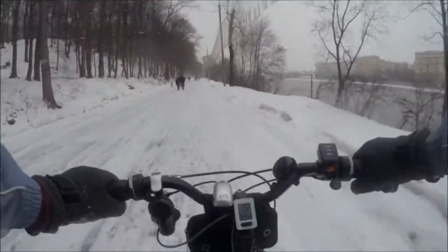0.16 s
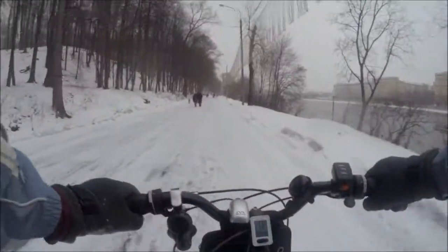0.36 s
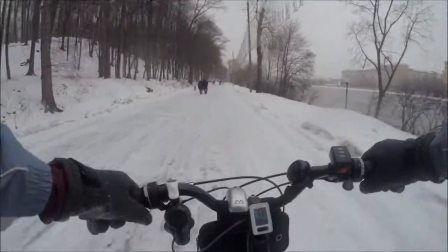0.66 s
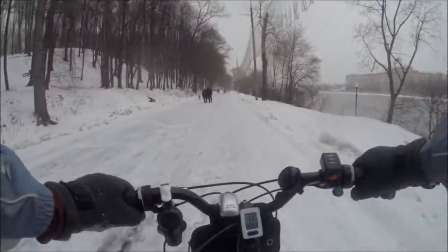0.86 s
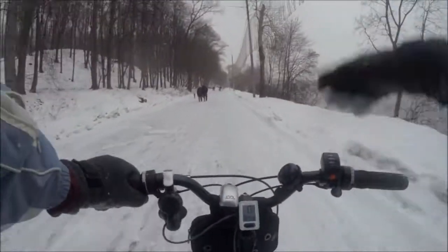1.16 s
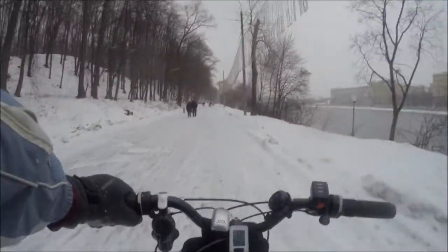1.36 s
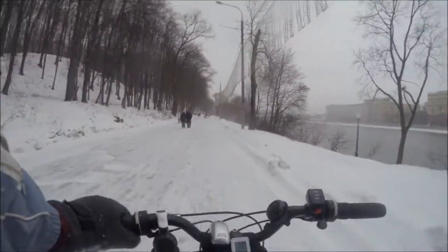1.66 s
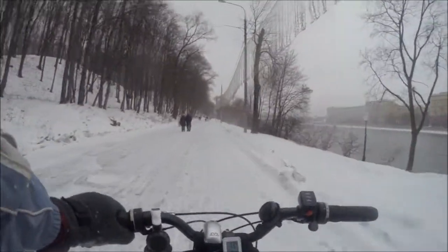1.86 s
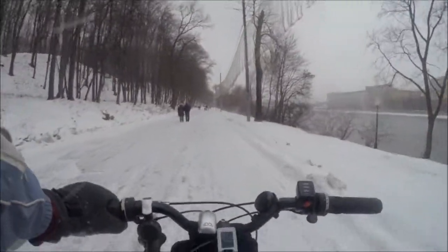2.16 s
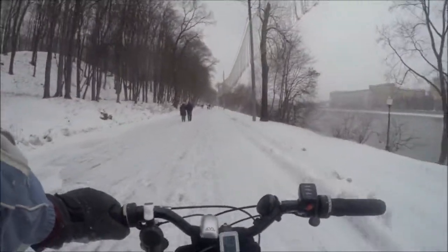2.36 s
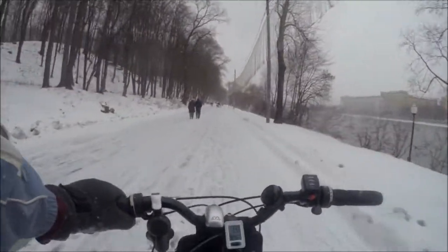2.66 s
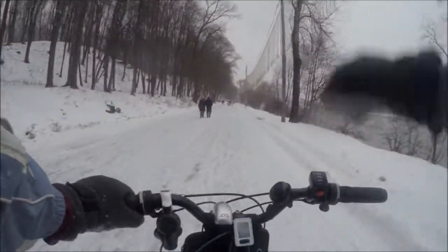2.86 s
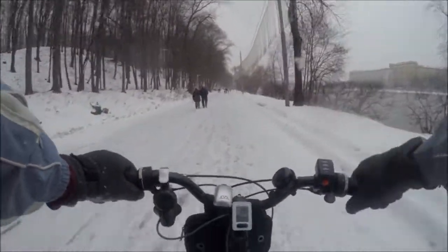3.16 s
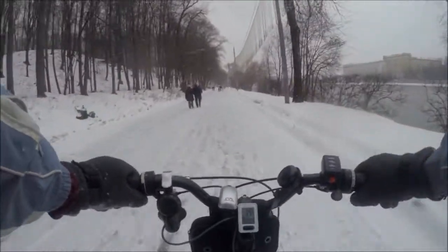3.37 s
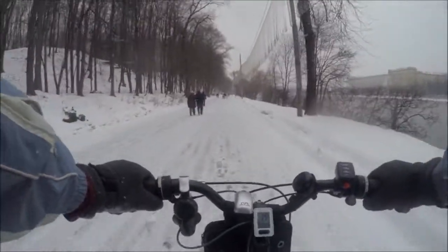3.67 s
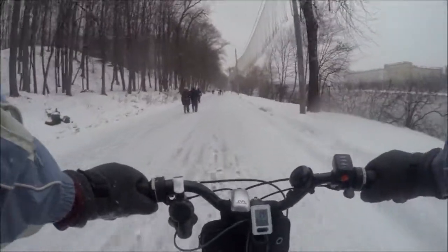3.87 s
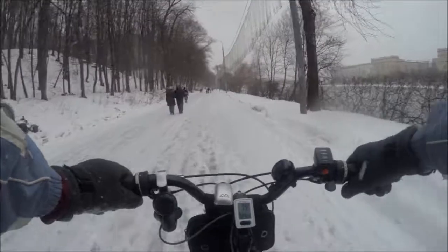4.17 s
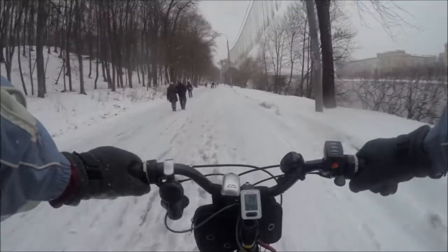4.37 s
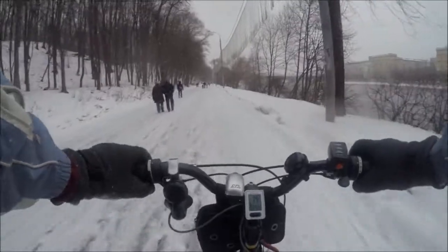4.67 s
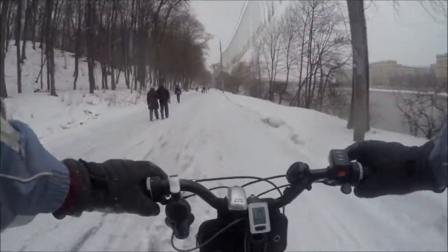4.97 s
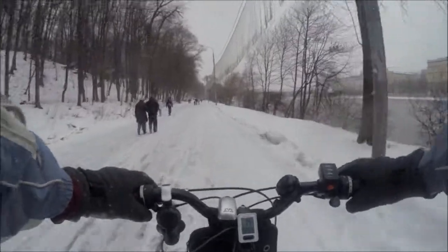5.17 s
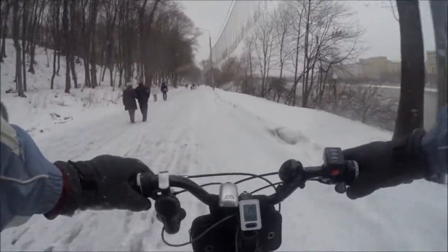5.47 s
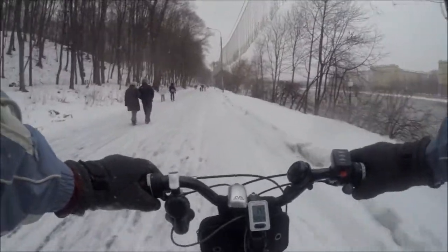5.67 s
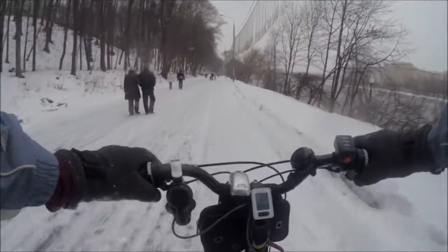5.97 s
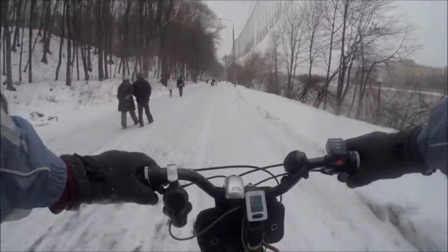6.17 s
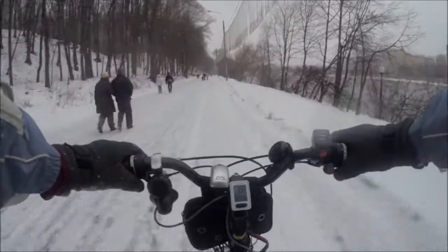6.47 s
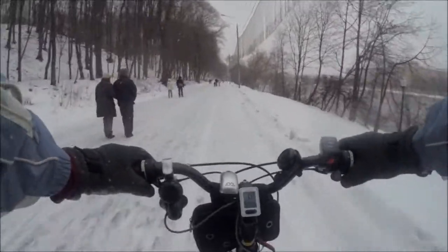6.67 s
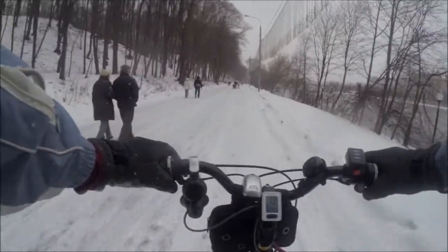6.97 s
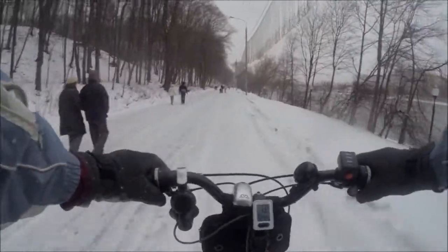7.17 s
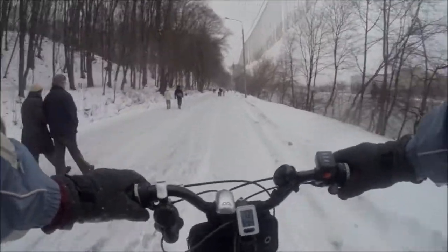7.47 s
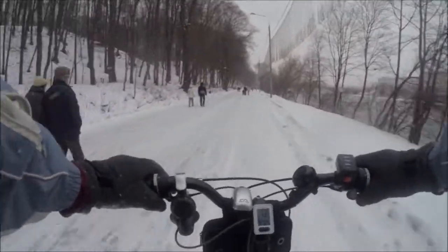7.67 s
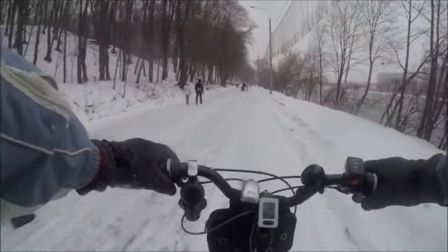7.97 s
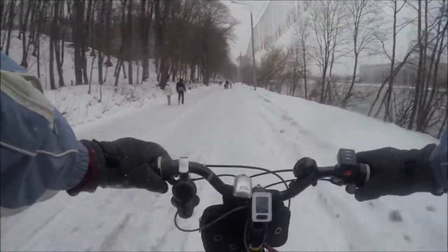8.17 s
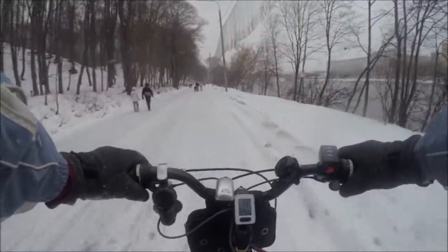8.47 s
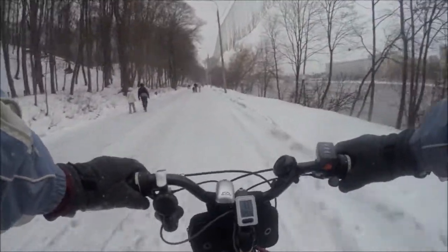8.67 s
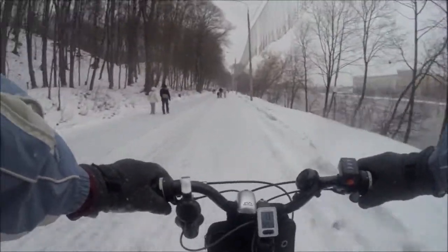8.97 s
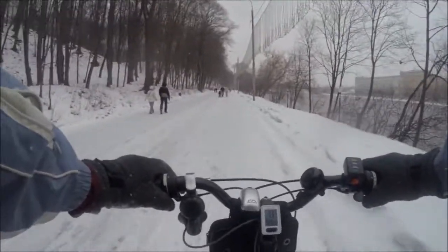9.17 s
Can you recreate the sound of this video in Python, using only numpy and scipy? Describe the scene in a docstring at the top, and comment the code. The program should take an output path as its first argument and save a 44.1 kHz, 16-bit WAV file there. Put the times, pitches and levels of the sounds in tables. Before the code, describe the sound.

A bicycle rolls over packed snow outdoors, heard from a microphone on the rider's chest. The grainy tyre hiss starts louder in loose snow, then settles quieter, with irregular crunches of breaking lumps. Soft low thuds mark regular pedal strokes over weak wind rumble. A sleeve brushes past early on, followed by dull knocks; small jacket ticks and a sharp snap come later.

```python
"""Bicycle tyres roll over packed snow, heard from a camera on the rider's chest: noise and tiny grains
are shaped into a hiss, with listed lumps and random crumbs of snow crunching as resonated cracks.
Each pedal stroke jogs the camera with a soft low thud, and coloured noise makes the wind rumble underneath.
A sleeve brushes past once and the jacket swishes, both as shaped noise; jacket ticks are filtered bursts.
Housing knocks, fitting snaps and frame bumps are dying sine modes, over faint microphone hiss."""
import sys
import numpy as np
from scipy import signal
from scipy.fft import rfft, irfft
from scipy.io import wavfile
from scipy.ndimage import uniform_filter1d

SR = 44100
rng = np.random.default_rng(int(sys.argv[2]) if len(sys.argv) > 2 else 0)


def wrap_up_sound(samples):
    """Save the sound to the file named by the first command line argument, as 16-bit audio."""
    columns = np.atleast_2d(samples).T
    # keep every value between -1 and 1, then stretch to whole-number steps
    tamed = np.clip(columns, -1, 1)
    steps = np.round(tamed * 32767).astype(np.int16)
    wavfile.write(sys.argv[1], SR, steps)


N = 411453
TIME = np.arange(N) / SR


def gain_of(db):
    """Decibels to gain."""
    return 10 ** (np.asarray(db) / 20)


def evened(x):
    """Scales to rms 1."""
    return x / np.sqrt(np.mean(x ** 2) + 1e-20)


def loudest(x):
    """The rms level of the strongest 5 ms."""
    return np.sqrt(uniform_filter1d(x ** 2, size=220, mode="constant").max())


def level(rows, axis=1):
    """Gain over time from one dB column of a curve."""
    rows = np.array(rows)
    return gain_of(np.interp(TIME, rows[:, 0], rows[:, axis]))


def coloured(x, points, rings=()):
    """Shapes the spectrum of x, with resonant bumps on top, and evens it to rms 1."""
    hz = np.fft.rfftfreq(len(x), 1 / SR)
    point_hz, point_db = np.transpose(points)
    shape_db = np.interp(np.log(hz + 1), np.log(point_hz + 1), point_db)
    for centre, width, height in rings:
        shape_db = shape_db + height / (1 + (2 * (hz - centre) / width) ** 2)
    return evened(irfft(rfft(x) * gain_of(shape_db), len(x)))


def noise():
    """White noise."""
    return rng.standard_normal(N)


def drift(rate):
    """Random wander of rms 1, with a new target rate times a second."""
    return evened(np.interp(TIME * rate, np.arange(4000), rng.standard_normal(4000)))


def resonate(x, hz, width):
    """A two-pole resonance."""
    hz = min(hz, .45 * SR)
    return signal.lfilter(*signal.iirpeak(hz, hz / width, SR), x)


def add(mix, s, sound):
    """Lays a sound into the mix at time s."""
    start = round(s * SR)
    part = mix[max(start, 0):max(start + len(sound), 0)]
    part += sound[max(-start, 0):][:len(part)]


def swells(times, width_s):
    """A smooth hump of height 1 around each time."""
    humps = [np.exp(-.5 * np.minimum(abs(TIME - s) / width_s, 10) ** 2) for s in times]
    return np.max(humps, axis=0)


# tyres pressing the snow, from loose snow onto the packed track: time_s, level_db (before trims)
TYRE_LEVEL = [(0.0, -46), (0.17, -50), (0.35, -47.5), (0.52, -50), (0.62, -48), (0.72, -51.5),
              (0.89, -54.5), (0.98, -51), (1.22, -50), (1.4, -51), (1.65, -54.5), (2.35, -54.5),
              (2.52, -55.5), (2.88, -53.5), (3.47, -57), (3.78, -56), (4.12, -58), (4.58, -55.5),
              (4.78, -57.5), (5.45, -56.5), (6.17, -56.5), (6.33, -56.5), (6.6, -61), (6.89, -56),
              (7.45, -58), (8.2, -55.5), (8.5, -58.5), (9.33, -57.5)]
PLOUGH_DB, PLOUGH_S = 1, 0.028  # the hiss swells while a tyre ploughs through a lump


def pressure(roll_db=0.25, patch_db=.8, patches_per_s=26):
    """Gain of the tyre hiss: the depth of the snow, its chance patches and the lumps in it."""
    lumps = swells([row[0] + PLOUGH_S for row in SNOW_LUMPS], PLOUGH_S)
    return level(TYRE_LEVEL) * gain_of(roll_db + patch_db * drift(patches_per_s) + PLOUGH_DB * lumps)


def grain(t, hz, cycles, phase):
    """One crack in the snow: a quick swell and a few dying cycles."""
    age = t * hz / cycles
    return np.sqrt(age) * np.exp(-2 * age) * np.sin(2 * np.pi * (hz * t + phase))


# hiss of hard-packed snow: freq_hz, relative_db (per Hz)
PACKED_SNOW = [(100, -48), (300, -2), (520, -3), (820, -3.5), (1100, -10.5), (1350, -4), (1900, -5),
               (2650, -1.5), (3150, -3.5), (4200, -4.5), (6200, -10), (7300, -20), (12000, -22.5),
               (15000, -49)]
# hiss of deeper, looser snow: freq_hz, relative_db (per Hz)
LOOSE_SNOW = [(250, -7.5), (540, -14.5), (820, -7), (1120, -12.5), (1600, -7.5), (1960, -0.5), (2400, -5.5),
              (2750, -4.5), (3300, -11.5), (5300, -14.5), (6300, -16), (7400, -30), (15000, -37.5)]
# rings of wheel and frame in the hiss: centre_hz, width_hz, boost_db
WHEEL_RINGS = [(1612, 177, 9), (1970, 244, 7.5), (2307, 83, 9)]


def tyres(grains_per_s=480, spread_db=-0.5, grain_db=-10, uneven_db=1.5, loose_from_db=-56, loose_span_db=7):
    """Countless snow crystals shear as a hiss, with small cracks gathering in clumps."""
    grains, t = np.zeros(N), np.arange(512) / SR
    # the base rate of grains wanders up and down
    chance = grains_per_s / SR * gain_of(4.5 * drift(40))
    at = np.flatnonzero(rng.random(N) < chance)
    for start, (size, pitch, phase) in zip(at, rng.random((len(at), 3))):
        crack = grain(t, 1600 * 4 ** pitch, 2.5, phase)
        size_gain = gain_of(spread_db * min(-np.log(1 - size), 3))
        add(grains, start / SR, size_gain * crack)
    crush = noise() + gain_of(grain_db) * evened(grains)
    # looser snow is louder and masks the rings of the wheel
    press = pressure()
    loose = np.clip((20 * np.log10(press) - loose_from_db) / loose_span_db, 0, 1)
    packed_hiss = (1 - loose) * coloured(crush, PACKED_SNOW, WHEEL_RINGS)
    hiss = packed_hiss + loose * coloured(crush, LOOSE_SNOW)
    return gain_of(-0.92) * press * evened(hiss * gain_of(uneven_db * drift(70)))


# wind on the microphone, mostly dying away with weaker returns: time_s, level_db (before puffs and trim)
WIND_LEVEL = [(0, -51), (.2, -44), (.34, -51.5), (.62, -56), (.9, -56.5), (1.15, -55.5), (2.4, -59.5),
              (4.2, -74.5), (5, -62.5), (6.6, -69.5), (6.87, -57.5), (7.2, -66), (9.33, -76)]
# low buffeting of the wind: freq_hz, relative_db (per Hz)
WIND_BUFFET = [(15, 9), (40, 1), (70, -1.5), (108, 3.5), (175, -6.5), (310, -6.5), (500, -24), (1000, -49)]
# slow sway of the camera: freq_hz, relative_db (per Hz)
CAMERA_SWAY = [(3, -6), (9, 0.5), (20, 3.5), (30, -8), (50, -13.5), (100, -23.5), (300, -68.5)]
PUFF_DB, PUFF_S = 4.5, 0.024  # each pedal stroke pushes air past the microphone


def wind(gust_db=3, lump_db=1.2, lumps_per_s=14):
    """Lumpy low buffeting, stronger at each stroke, over the slow sway of the camera."""
    puffs = gain_of(PUFF_DB * swells([row[0] for row in PEDAL_STROKES], PUFF_S))
    gusts = gain_of(gust_db * drift(55) + lump_db * drift(lumps_per_s))
    buffet = level(WIND_LEVEL) * puffs * coloured(noise() * gusts, WIND_BUFFET)
    return gain_of(2.5) * buffet + gain_of(-48.0) * coloured(noise(), CAMERA_SWAY)


# steady faint hiss of the microphone: freq_hz, relative_db (per Hz)
MICROPHONE_HISS = [(200, 8), (1000, 12.5), (4000, 8.5), (7200, -2.5), (9500, -0.5), (12500, -9),
                   (15000, -10)]


def microphone():
    """Self-noise with a thin, faint whine of narrowly resonated noise."""
    whine = evened(resonate(resonate(noise(), 14140, 90), 14140, 90))
    return gain_of(-65.0) * coloured(noise(), MICROPHONE_HISS) + gain_of(-90) * whine


def crumbs(crumbs_per_s=40, crumb_db=-59.5, follow=.6, spread_db=3.0, t60=0.014,
           low_hz=1500, high_hz=5000, width_hz=950):
    """Small crumbs of snow snap at random, each at its own pitch, louder where the snow is deep."""
    snaps, t = np.zeros(N), np.arange(1024) / SR
    cracks = noise()
    for place, size, pitch in rng.random((int(crumbs_per_s * N / SR), 3)):
        crack = cracks[int(place * (N - len(t))):][:len(t)] * gain_of(-60 * t / t60)
        hz = low_hz * (high_hz / low_hz) ** pitch
        crack = resonate(resonate(crack, hz, width_hz), hz, width_hz)
        # higher crumbs are quieter
        crumb_gain = gain_of(spread_db * size ** 2) * low_hz / hz
        add(snaps, place * N / SR, crumb_gain * crack / loudest(crack))
    return gain_of(crumb_db) * evened(level(TYRE_LEVEL)) ** follow * snaps


# pedal strokes, some hard and some easy: time_s, jolt_db, swing_back_db (both before stroke_db)
PEDAL_STROKES = [(.012, -38, -35), (0.39, -33, -38), (0.77, -30.5, -34), (1.149, -37, -46),
                 (1.533, -36, -45), (1.916, -35, -34.5), (2.296, -31, -31), (2.675, -31, -38),
                 (3.057, -37, -37), (3.438, -32.5, -43), (3.817, -32, -33), (4.197, -30.5, -39.5),
                 (4.578, -32, -39.5), (4.96, -29, -34), (5.344, -33, -31), (5.723, -29.5, -35.5),
                 (6.103, -27.5, -35.5), (6.489, -30.5, -37.5), (6.873, -33.5, -44), (7.257, -36.5, -39.5),
                 (7.642, -29.5, -32), (8.021, -31, -31.5), (8.416, -32.5, -35), (8.805, -28, -34),
                 (9.191, -30, -35.5)]


def pedalling(jolt_hz=43, jolt_s=0.0089, rebound_hz=27, rebound_s=0.015, delay_s=0.0404, stroke_db=2.0):
    """Each stroke jolts the camera, which swings back a moment later; timing and pitch vary by chance."""
    out, t = np.zeros(N), np.arange(-4096, 8192) / SR
    chances = rng.standard_normal((len(PEDAL_STROKES), 3))
    for (s, jolt_db, rebound_db), (speed, lag, pitch) in zip(PEDAL_STROKES, chances):
        early = t * (1 + 0.099 * speed)
        jolt = np.cos(2 * np.pi * jolt_hz * early) * np.exp(-.5 * (early / jolt_s) ** 2)
        late = t - delay_s * (1 + 0.11 * lag)
        swing = np.cos(2 * np.pi * rebound_hz * (1 + 0.38 * pitch) * late)
        rebound = swing * np.exp(-.5 * (late / rebound_s) ** 2)
        add(out, s + t[0], gain_of(jolt_db) * jolt + gain_of(rebound_db) * rebound)
    return gain_of(stroke_db) * out


# the larger lumps of snow breaking under the tyres: start_s, level_db (strongest 5 ms), centre_hz, t60_s
SNOW_LUMPS = [(0.068, -50, 2900, .03), (0.284, -41.5, 1980, 0.028), (0.356, -44.5, 2330, .035),
              (0.546, -43, 2620, 0.045), (0.594, -51, 3300, .04), (0.797, -50, 3050, 0.03),
              (0.861, -52, 1700, .04), (1.734, -44.5, 2460, 0.038), (1.784, -49, 2600, 0.023),
              (2.07, -46, 2200, 0.047), (2.15, -48, 2400, 0.12), (2.195, -43.5, 2090, 0.11),
              (2.273, -38.5, 2780, 0.014), (2.364, -44, 3200, 0.1), (2.423, -45.5, 2500, 0.028),
              (3.351, -47.5, 2620, 0.083), (3.57, -50.5, 2480, 0.14), (3.757, -48.5, 2100, 0.11),
              (3.834, -46, 2200, 0.13), (3.998, -49, 3150, 0.044), (4.298, -43, 2520, 0.069),
              (4.63, -47.5, 2200, 0.075), (5.381, -52, 2500, .05), (5.544, -44.5, 2280, 0.031),
              (5.71, -46.5, 2270, 0.087), (5.893, -47, 2500, 0.061), (6.304, -50, 2500, 0.1),
              (6.403, -49, 2400, .04), (6.786, -48.5, 2160, 0.034), (6.884, -47, 2400, .06),
              (7.304, -46.5, 2520, 0.041), (7.471, -44, 1640, 0.044), (8.065, -60, 2700, 0.08),
              (8.133, -52.5, 2300, 0.14), (8.315, -57, 3200, .025), (8.413, -50, 2350, .04),
              (8.831, -51, 1800, 0.067), (8.958, -47.5, 2580, 0.08), (8.995, -49.5, 2770, .035),
              (9.079, -52.5, 2680, .03)]


def crunches(width_share=.85, snap_db=6, snap_t60=0.02, ragged_db=4, spray_hz=5400, spray_db=-8):
    """A lump snaps, then collapses in ragged, dying cracks that ring the wheel, with a fine spray above."""
    out, t = np.zeros(N), np.arange(-512, 7680) / SR
    age, ragged = np.maximum(t, 0), gain_of(ragged_db * np.minimum(drift(400), 1))
    for s, db, hz, t60 in SNOW_LUMPS:
        cracks = rng.choice([-1, 1], len(t)) * (t >= 0)
        collapse = gain_of(-60 * age / t60) * np.roll(ragged, -round(s * SR))[:len(t)]
        # brittle lumps, which collapse quickly, snap hardest
        snap = gain_of(snap_db - 60 * age / snap_t60) * snap_t60 / t60
        width = width_share * hz
        body = resonate(resonate(cracks * (snap + collapse), hz, width), hz, width)
        spray = gain_of(spray_db) * resonate(cracks * collapse, spray_hz, hz)
        lump = coloured(body + spray, PACKED_SNOW, WHEEL_RINGS)
        add(out, s + t[0], gain_of(db) * lump / loudest(lump))
    return out


# light ticks of the jacket: start_s, peak_db (before trim), centre_hz, fizz_db (before fizz_db below)
JACKET_TICKS = [(.623, -47, 6500, -12), (1.883, -51, 5340, -34), (3.0353, -38.5, 4400, -31),
                (3.2789, -49, 6480, -20.5), (3.5084, -46, 5900, -27), (4.3913, -37.5, 6500, -17),
                (4.4398, -49, 6120, -26), (4.4817, -46.5, 4870, -22), (5.007, -34.5, 4800, -4),
                (5.5922, -45.5, 6340, -49), (8.5275, -49, 6200, -31)]


def ticks(width_hz=1200, t60=0.014, fizz_db=12):
    """Stiff fabric flicks: a dying noise burst gives a short bright ring with a broader fizz."""
    out, t = np.zeros(N), np.arange(2048) / SR
    for s, db, hz, top_db in JACKET_TICKS:
        flick = rng.standard_normal(len(t)) * gain_of(-60 * t / t60)
        fizz = gain_of(top_db + fizz_db) * evened(resonate(flick, 3200, 4800))
        tick = evened(resonate(flick, hz, width_hz)) + fizz
        add(out, s, gain_of(db + 1.0) * tick / abs(tick).max())
    return out


# a sleeve brushing past: time_s, rub_level_db, flutter_level_db
SLEEVE_BRUSH = [(1.34, -74, -70), (1.38, -44, -45), (1.43, -48, -46), (1.462, -41, -49.5),
                (1.495, -39.5, -41.5), (1.525, -51.5, -61), (1.62, -64, -63)]
# rubbing cloth: freq_hz, relative_db (per Hz)
SLEEVE_CLOTH = [(150, 8.5), (350, -9), (560, -18), (820, 4.5), (1100, -10), (2150, 6.5), (2800, 1),
                (3400, -8.5), (5300, -9), (7500, -25), (15000, -36)]


def sleeve(catch_db=1.0, flutter_hz=135):
    """Cloth catches and slips as uneven noise, and flutters low against the housing."""
    rub = coloured(noise() * gain_of(catch_db * drift(300)), SLEEVE_CLOTH)
    flutter = evened(resonate(resonate(noise(), flutter_hz, 197), flutter_hz, 214))
    return level(SLEEVE_BRUSH) * rub + level(SLEEVE_BRUSH, axis=2) * flutter


# the camera housing rings with knocks and snaps: mode_hz, relative_db, t60_s
HOUSING_MODES = [(326, -16.5, 0.03), (807, -12.5, 0.02), (1490, -9.5, 0.013), (1980, -1.5, .01),
                 (2656, 1, 0.0098), (5200, 0, 0.0069), (6120, -2.5, 0.0057), (9300, -18, 0.0041)]


def blows(rows, soft_hz, light_hz, contact_s, crack_db):
    """Blows crack and ring the housing; a soft contact spares its high modes, a light one its low modes."""
    out, t = np.zeros(N), np.arange(2048) / SR
    for s, db in rows:
        ring = np.zeros(len(t))
        for hz, mode_db, t60 in HOUSING_MODES:
            contact = 1 / (1 + (hz / soft_hz) ** 4) ** .5 / np.hypot(1, light_hz / hz)
            detuned_hz = hz * (1 + .02 * rng.standard_normal())
            ring += gain_of(mode_db - 60 * t / t60) * contact * np.sin(2 * np.pi * detuned_hz * t)
        crack = rng.standard_normal(len(t)) * gain_of(crack_db - 60 * t / 0.0038)
        blow = (ring / abs(ring).max() + crack) * (1 - np.exp(-t / contact_s))
        add(out, s, gain_of(db) * blow / loudest(blow))
    return out


# sharp snaps of the fittings: start_s, level_db (strongest 5 ms)
FITTING_SNAPS = [(1.4581, -40), (5.2137, -35.5)]


def snaps():
    """Hard, light contacts bring out the high modes of the housing."""
    return blows(FITTING_SNAPS, soft_hz=12000, light_hz=1100, contact_s=0.00047, crack_db=-32)


# dull knocks near the camera: start_s, level_db (strongest 5 ms)
DULL_KNOCKS = [(1.8168, -41.5), (1.8475, -43), (1.9595, -44.5), (2.0398, -41)]


def knocks():
    """Softer, slower contacts dull the high modes of the housing."""
    return blows(DULL_KNOCKS, soft_hz=1880, light_hz=200, contact_s=0.0008, crack_db=-36)


# small bumps in the track, felt through the frame: start_s, peak_db, pitch_ratio
TRACK_BUMPS = [(2.66, -43, 1.15), (7.013, -37, 1), (7.368, -38, .75), (8.028, -41, 1.05), (8.174, -40, .8)]
# the frame's low shudder: mode_hz (before pitch_ratio), relative_db, t60_s
FRAME_MODES = [(133, 5.5, 0.024), (255, -4.5, 0.033), (795, -11.5, 0.021)]


def bumps():
    """The frame shudders briefly in dying modes, at a pitch set for each bump."""
    out, t = np.zeros(N), np.arange(4096) / SR
    for s, db, pitch in TRACK_BUMPS:
        shudder = sum(gain_of(mode_db - 60 * t / t60) * np.sin(2 * np.pi * hz * pitch * t)
                      for hz, mode_db, t60 in FRAME_MODES)
        add(out, s, gain_of(db) * shudder / abs(shudder).max())
    return out


# nylon sliding on nylon: start_s, length_s, level_db (at the middle of the slide)
JACKET_SWISHES = [(4.24, .14, -69.5), (5.53, .13, -72.5)]
# treble of the nylon: freq_hz, relative_db (per Hz)
NYLON_TREBLE = [(4000, -30.5), (7500, -10), (9800, 7), (11500, -22), (13800, -1), (15000, -18)]


def swishes():
    """Fine, grainy treble noise swells and fades as the jacket slides."""
    slide = sum(gain_of(db) * np.sin(np.pi * np.clip((TIME - s) / length, 0, 1))
                for s, length, db in JACKET_SWISHES)
    return slide * coloured(noise() * gain_of(5.8 * drift(120)), NYLON_TREBLE)


def scene():
    """Everything at the one microphone."""
    bicycle = tyres() + crumbs() + pedalling() + crunches() + bumps()
    jacket = ticks() + sleeve() + swishes()
    housing = snaps() + knocks()
    return (bicycle + jacket + housing + wind() + microphone())[None]


EDGE_HZ = 15250  # upper edge of the recorder's band


def record(dry):
    """The recorder's band limit, a steep low-pass."""
    low_pass = signal.firwin(511, EDGE_HZ, window=("kaiser", 9), fs=SR)
    return signal.oaconvolve(dry, low_pass[None], "same")


dry = scene()
out = record(dry)
wrap_up_sound(out)
```